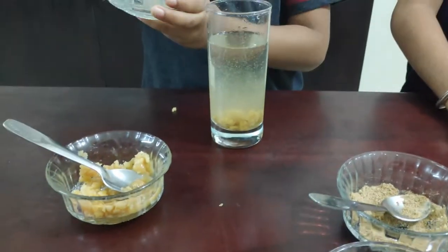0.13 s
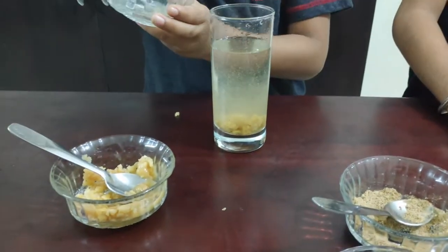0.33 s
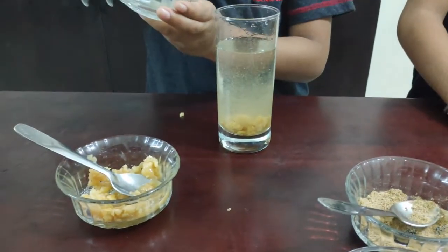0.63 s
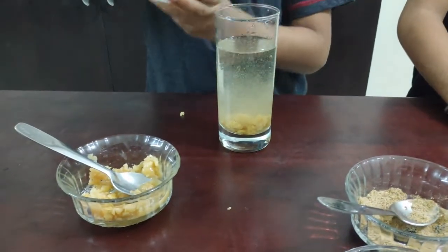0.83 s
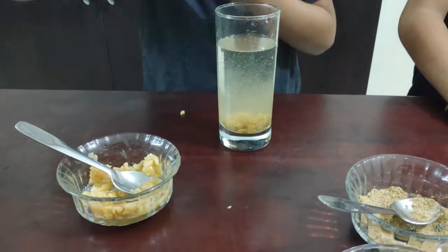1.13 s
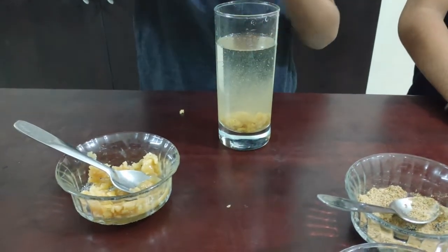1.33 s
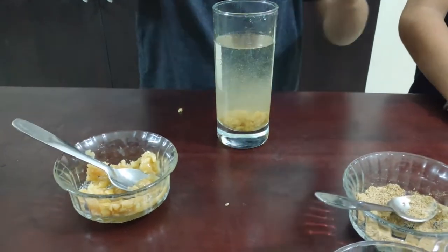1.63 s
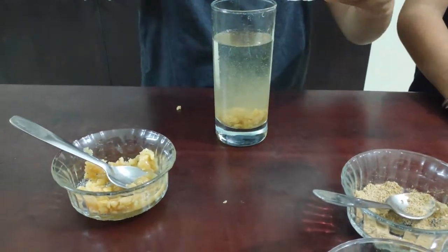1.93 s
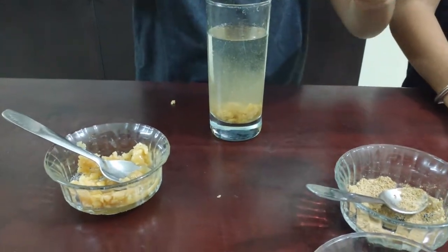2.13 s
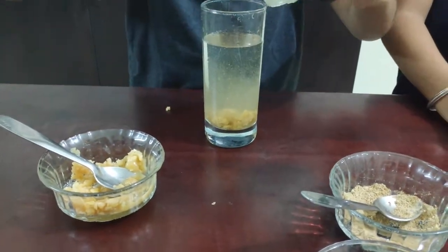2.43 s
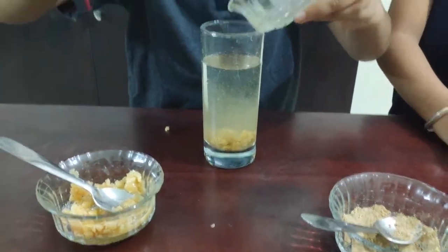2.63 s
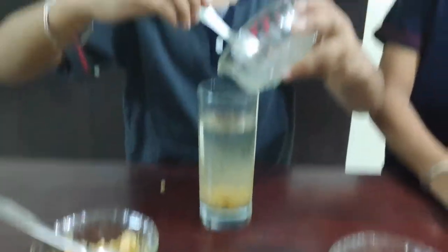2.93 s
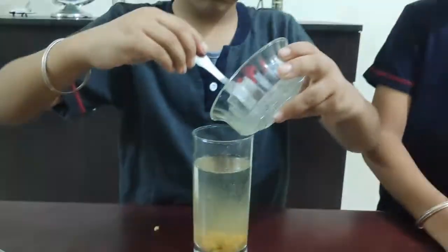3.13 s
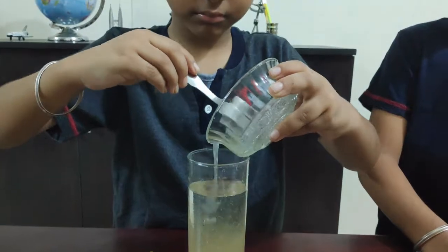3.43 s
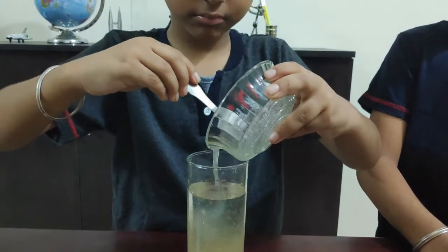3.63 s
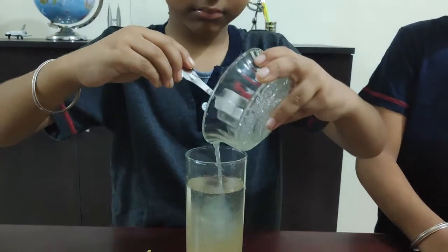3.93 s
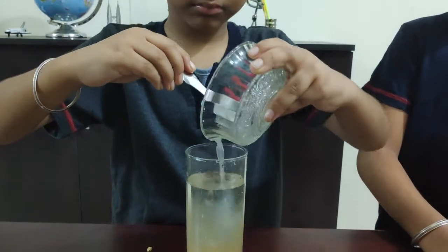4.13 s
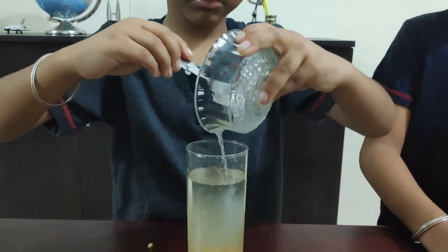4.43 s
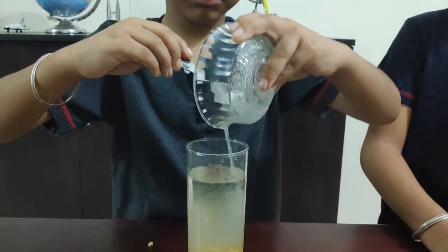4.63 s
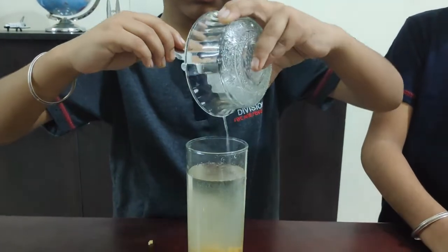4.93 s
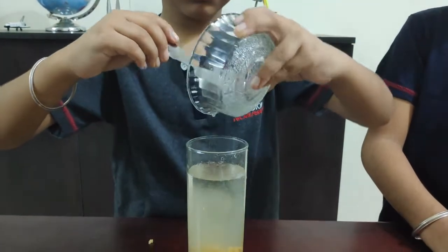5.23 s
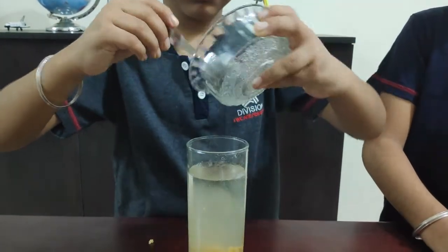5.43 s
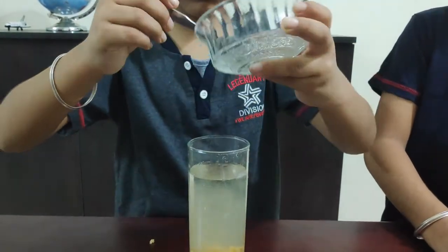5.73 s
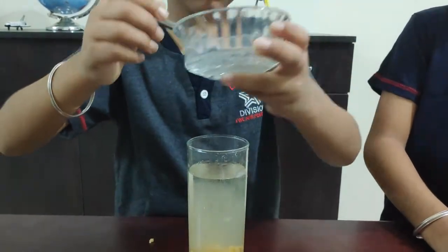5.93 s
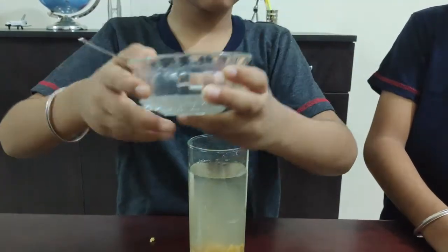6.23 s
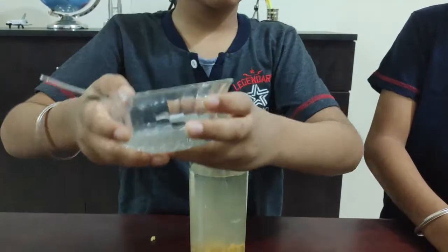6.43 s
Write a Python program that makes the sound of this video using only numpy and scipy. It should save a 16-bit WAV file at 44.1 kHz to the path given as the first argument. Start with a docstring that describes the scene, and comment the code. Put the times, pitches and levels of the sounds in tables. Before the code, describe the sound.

In a hard-walled room, a spoon taps a hand-held glass bowl; one wooden thud rattles glassware, then liquid pours briefly with small plops.

```python
"""A clink is already dying away in a hard-walled kitchen as a steel spoon clinks and scrapes in a hand-held glass bowl:
damped modes struck at bottom, wall or rim, and band-filtered friction noise. At 3 s one knock on the wooden table
thuds and sets glassware ringing. Then juice is tipped into a tumbler: fine spatter, a gush of low noise, and drops
that tick and plop as trapped bubbles, while the spoon clinks on to the end. A phone with two unlike ports listens
from close by, through echoes, reverberation and a low room tone."""
import sys
import numpy as np
from scipy import signal
from scipy.fft import rfft, irfft
from scipy.io import wavfile
from scipy.ndimage import uniform_filter1d

SR = 44100
rng = np.random.default_rng(int(sys.argv[2]) if len(sys.argv) > 2 else 0)


def to_wav(sig):
    """Store sig (one row per channel, or 1-D mono) as 16-bit WAV at the path in sys.argv[1].

    Samples outside -1..1 are clipped; the rate is SR.
    """
    pcm = np.clip(np.atleast_2d(sig), -1, 1) * 32767
    pcm = np.round(pcm).astype(np.int16)
    wavfile.write(sys.argv[1], SR, pcm.T)  # frames by channels


N = 289852
T = np.arange(N) / SR
AGE = T[:SR]  # time since a blow, s
ATTACK = SR // 100  # a hundredth of a second, in samples
TOP_HZ = 15900  # the phone's upper limit


def undb(db):
    """Amplitude ratio: 20 dB is a factor of ten."""
    return 10 ** (np.asarray(db) / 20)


def along(hz, points, column=1):
    """Interpolate a table on a log-frequency axis, as pitch is heard."""
    points = np.array(points)
    return np.interp(np.log(hz + 1e-9), np.log(points[:, 0]), points[:, column])


def bins(x):
    """Frequencies of the Fourier components of a sound."""
    return np.fft.rfftfreq(x.shape[-1], 1 / SR)


def noise(points, size):
    """Coloured noise: a white spectrum shaped by a (f/Hz, level/dB) table, then scaled to rms 1."""
    white = rng.standard_normal(size)
    coloured = irfft(rfft(white) * undb(along(bins(white), points)), size)
    return coloured / coloured.std()


def fade(t60):
    """Exponential damping: the amplitude falls 60 dB in t60 seconds."""
    return np.exp(-np.log(1000) * AGE / t60)


def blow(x, db):
    """Impact level: set the rms of a blow's first hundredth of a second."""
    return x * undb(db) / np.sqrt(np.mean(x[:ATTACK] ** 2))


def ring(modes, stretch=1, scatter_db=0):
    """Modal superposition: damped sines, weighted a little differently at each striking point."""
    out = 0
    for hz, db, t60 in modes:
        gain = undb(db + scatter_db * rng.standard_normal())
        phase = 2 * np.pi * (hz * stretch * AGE + rng.random())
        out = out + gain * fade(t60) * np.sin(phase)
    return out


def cluster(hz):
    """Beating: a high mode interferes with two weaker neighbours."""
    return ring([(hz, 0, .03), (hz + 95, -8, .04), (hz - 170, -5, .01)])


def add(track, s, x):
    """Superposition: mix x into the track at time s."""
    i = int(s * SR)
    track[i:i + len(x)] += x[:len(track) - i]


def room_tone():
    """Stereo coherence: both ports share a low hum; the opposed-phase part is relatively stronger in the treble."""
    # colour of the room tone: f/Hz, relative level/dB
    hum_colour = [(15, -13.5), (26, -3.5), (37, 10), (55, -8), (90, -8), (200, -10.5), (400, -14.5),
                  (540, -24.5), (1100, -25), (2400, -30), (5000, -33), (16000, -36)]
    mid, side = noise(hum_colour, size=N), noise(hum_colour, size=N)
    width = undb(along(bins(side), [(40, -12.5), (250, -14.5), (700, 0.0), (3000, -3.0)]))
    side = irfft(rfft(side) * width, N)
    return undb(-61.0) * (mid + np.array([side, -side]))


def kitchen(dry, wet_db):
    """Room response: direct sound, discrete echoes and a diffuse tail, less alike at the ports as pitch rises."""
    # discrete echoes, from nearby surfaces to a late room flutter: delay/s, level/dB
    echoes = [(.0007, -4), (.0017, -18), (0.013, -9.5), (.0175, -26.5), (0.082, -25)]
    # reverberation: f/Hz, t60/s, level/dB before the wet level is added
    reverberation = [(149.5, 0.51, 2), (770, 0.96, -3), (2470, 0.73, -1), (6240, 0.58, -3),
                     (11700, 0.46, 0.5), (16200, 0.45, -7)]
    edges = np.r_[0, np.geomspace(200, 14000, 12), SR]
    hz, shared = bins(AGE), rfft(rng.standard_normal(SR))
    alike = np.exp(-(hz / 550) ** 2)  # long waves are the same at both ports
    out = []
    for _ in range(2):
        own = rfft(rng.standard_normal(SR))
        white = np.sqrt(alike) * shared + np.sqrt(1 - alike) * own
        response = np.zeros(SR)
        for lo, hi in zip(edges, edges[1:]):
            centre = (lo + min(hi, TOP_HZ)) / 2
            tail = fade(along(centre, reverberation)) * (1 - fade(0.02))
            band = irfft(white * (hz >= lo) * (hz < hi), SR)
            level = undb(wet_db + along(centre, reverberation, 2))
            response += level * band * tail / np.linalg.norm(tail)
        response[0] += 1  # direct sound
        for delay, db in echoes:
            detour = .0005 * rng.random()  # each port has its own path, s
            add(response, delay + detour, undb([db]))
        out.append(signal.fftconvolve(dry, response)[:len(dry)])
    return np.array(out)


def stream():
    """Turbulent burble: low coloured noise swells and dies exponentially as juice gushes into the drink."""
    peak_s, rise_s, fall_s = 3.93, .1, 0.3  # rise and fall are time constants
    gush = undb(-60.5) * np.exp(-np.maximum((peak_s - T) / rise_s, (T - peak_s) / fall_s))
    burble = [(50, -15.5), (110, -1), (240, 2.0), (420, -9), (2000, -24.5), (9000, -39.0)]  # f/Hz, level/dB
    return gush * noise(burble, size=N)


def friction():
    """Stick-slip: grainy noise from sliding edges that catch and let go, each swell in its own resonance."""
    # soft scrapes, rubs and faint squeaks: middle t/s, length/s, f/Hz, bandwidth/Hz, level/dB
    rubs = [(1.014, 0.12, 1080, 500, -75), (1.874, 0.5, 1128, 110, -77.5), (2.1, 0.15, 179, 112.7, -68),
            (3.7, 0.29, 2560, 701, -72.5), (5.824, 0.09, 9300, 6250, -61.5), (5.953, 0.3, 1480, 1000, -68),
            (6.276, 0.14, 700, 1430, -61.5), (6.535, 0.16, 12400, 1510, -66)]
    catch_db = 2  # spread of the level from one hundredth of a second to the next
    out = 0
    for s, length, hz, width, db in rubs:
        holds = np.repeat(rng.standard_normal(N // ATTACK + 1), ATTACK)[:N]
        grains = undb(2.5 * rng.exponential(size=N))
        slips = undb(catch_db * holds) * rng.standard_normal(N) * grains
        resonance = 1 / (1 + (2 * (bins(slips) - hz) / width) ** 2)
        band = irfft(rfft(slips) * resonance, N)
        swell = np.exp(-(2 * (T - s) / length) ** 2)
        out = out + undb(db) * band / band.std() * swell
    return out


def tick():
    """Surface impact: a drop's slap is a short burst of bright noise."""
    return noise([(1500, -21), (4500, 0.0), (7500, -3.5), (15000, -4.5)], size=SR) * fade(.012)


def drips(lead):
    """Bubble resonance: big drops tick and trap a short-lived bubble; fine spatter only ticks."""
    # drops landing in the tumbler: t/s, bubble f/Hz, plop level/dB
    drops = [(3.739, 1650, -50), (4.2083, 1650, -54), (4.4308, 2530, -75), (4.9206, 2310, -63),
             (5.1518, 2170, -53), (5.178, 1940, -42.5), (5.351, 2100, -57)]
    tick_db = -52.5  # every big drop's tick
    spatter_start_s, spatter_end_s, spatter_db, spatter_spread_db = 3.6, 3.8, -70.5, 4
    out = np.zeros(N + SR)
    for s, hz, plop_db in drops:
        plop = np.sin(2 * np.pi * hz * AGE) * fade(0.01) * (1 - fade(0.0072))
        add(out, s + lead, blow(plop, plop_db) + blow(tick(), tick_db))
    for when in (np.arange(9) + rng.random(size=9)) / 9:  # nine ticks, unevenly spaced
        s = spatter_start_s + when * (spatter_end_s - spatter_start_s)
        add(out, s + lead, blow(tick(), spatter_db + spatter_spread_db * rng.standard_normal()))
    return out


def table(lead):
    """Impact excitation: a knock thuds through the table top and leaves the glassware in free vibration."""
    # noise of the thud: f/Hz, level/dB
    thud_colour = [(40, -6), (110, -4), (200, -3), (310, 8), (450, 0), (560, 1.5), (830, 10.5),
                   (1150, -6.5), (1450, 5.5), (1850, -10), (2500, -8), (3800, -27), (5000, -10.5),
                   (16000, -31)]
    # modes of the shaken glassware: f/Hz, level/dB, t60/s
    glass_modes = [(183, -6, .7), (291, -4, .4), (781, -7, .4), (829, -7, .35), (1152, -7, .4),
                   (1238, -8, .3), (1486, -5, .95), (1637, -8, .25), (2632, -2, .33), (3241, -6, .6),
                   (4430, -11, .25), (4931, -4, .3), (5943, -8, .4), (6336, -4, .25), (7450, 1, .2),
                   (9367, -7, .1), (11200, -8, .2), (13550, -17, .2)]
    # modes of the wooden table top: f/Hz, level/dB, t60/s
    wood_modes = [(308, -22.5, 0.042), (390, -12.5, 0.053), (703, -2, 0.019), (800, -0.5, 0.027),
                  (860, -2, 0.022), (970, -1, 0.025), (1170, -1.5, 0.026), (1354, 2, 0.016),
                  (1827, -1.5, 0.019), (1843, 5, 0.011)]
    knock_s = 2.9783
    out = np.zeros(N + SR)
    push = 1 - fade(.008)  # softens the onset of all three parts
    wood = blow(ring(wood_modes), db=-24)
    rattle = undb(-25.0) * fade(0.15)  # things on the table, faintly
    thud = blow(noise(thud_colour, size=SR) * (fade(0.019) + rattle), db=-21.0)
    glassware = blow(ring(glass_modes), db=-33.5)
    add(out, knock_s + lead, push * (wood + thud + glassware))
    return out


def spoon(lead):
    """Modal excitation by position: contacts click, clack and ring; nearer the rim, more ring and less clack."""
    # spoon on bowl; the grip retunes the spoon:
    # t/s, strength/dB, place (0 bottom to 1 rim), handle's ring f/Hz, scoop's ring f/Hz
    contacts = [(-.02, -34.5, 0.84, 4350, 11200), (.588, -51.5, 0.51, 5350, 9960),
                (1.145, -47.5, 0.29, 7180, 8530), (1.552, -39, 0.66, 4500, 10760),
                (1.584, -41, 0.65, 4120, 10540), (1.64, -37, 0.7, 4400, 10160),
                (2.3306, -39.5, 0.027, 4630, 10120), (2.9182, -40.5, 0.3, 4630, 11500),
                (3.4228, -40.5, 0.073, 4650, 11060), (3.8907, -38.5, 0.39, 4790, 11450),
                (4.0312, -34, 0.94, 3490, 11480), (4.3405, -38.5, .5, 5470, 11770),
                (4.515, -27.5, 0.87, 4750, 11000), (4.7834, -35.5, 0.493, 5280, 11670),
                (5.021, -41, 0.77, 4750, 11000), (5.3493, -62, 0.0074, 4100, 10300),
                (5.628, -46.5, 0.52, 3703, 10250), (5.9735, -56, 0.26, 2750, 11540),
                (6.1131, -34, 0.69, 3710, 10380), (6.127, -37.5, 0.64, 3300, 11000),
                (6.4628, -52.5, 0, 4270, 12250)]
    # the held bowl's bright ring at rest pitch: f/Hz, level/dB, t60/s
    bowl_modes = [(3440, -36, .04), (4480, -29, .03), (6370, 0, .031), (6440, -14, .07), (6900, -20, .01)]
    # the bowl's lowest pair of modes: f/Hz, level/dB, t60/s
    low_modes = [(2615, 0, .04), (2660, -3, .14)]
    # the bowl's pitch, sinking as juice runs up its wall and recovering as it drains: t/s, f/Hz
    bowl_pitch = [(0, 6394), (1.6, 6444), (3.9, 6328), (4.5, 6384), (6.1, 6494)]
    # the spoon's dull clack: f/Hz, level/dB, t60/s
    clack_modes = [(720, -8, .012), (1250, -7, .009), (1620, 0, .013), (1950, -2, .01), (3100, -7, .008),
                   (3770, -15, .015), (4660, -9, .014), (5400, -9, .014)]
    # high partials of steel and glass: f/Hz, level/dB, t60/s
    shimmer_modes = [(9800, -6, .02), (10100, -7, .03), (11490, 0, .035), (13800, -6, .02),
                     (14300, -4, .025), (14900, 0, .03), (15420, 0, .03)]
    # noise of the contact click: f/Hz, level/dB
    click_colour = [(400, -18), (1200, -29), (2400, -4.5), (3200, 0.5), (4600, -5.5), (7000, 3),
                    (8300, -3.5), (10500, 1.5), (13000, -5.5), (16000, -8)]
    # each part against the click: level/dB at the bottom, on the wall, at the rim
    place_db = {"clack": (-2, -4.5, -38), "low": (-26, -19, -4), "bowl": (-25.5, -3.5, 18),
                "top": (-25.5, -15, 9), "scoop": (-2, -3.5, 0), "handle": (-8.5, -13.5, -19)}
    bowl_rest_hz, bowl_top_hz = 6367, 10726  # reference pitch; highest strong mode at rest
    out = np.zeros(N + SR)
    bite = 1 - fade(0.0042)  # the edge takes a moment to seat on the glass
    for s, db, place, handle_hz, scoop_hz in contacts:
        grip = 1 + .005 * rng.standard_normal()
        stretch = np.interp(s, *np.transpose(bowl_pitch)) / bowl_rest_hz
        click = noise(click_colour, size=SR) * fade(.017)
        shimmer = ring(shimmer_modes, grip, scatter_db=2.5)
        scoop_overtone = undb(-5) * cluster(9250 + scoop_hz / 2)
        parts = {
            "clack": ring(clack_modes, grip, scatter_db=1.5),
            "low": ring(low_modes),
            "bowl": ring(bowl_modes, stretch),
            "top": cluster(bowl_top_hz * stretch),
            "scoop": cluster(scoop_hz) + scoop_overtone,
            "handle": ring([(handle_hz, 0, 0.047)]),
        }
        sound = blow(click, 0) + blow(shimmer, -5.5)  # shimmer is the same at every place
        for name, part in parts.items():
            sound += blow(part, np.interp(place, (0, .5, 1), place_db[name]))
        add(out, s + lead, undb(db) * bite * sound)
    return out


def scene():
    """Superposition in one room, already ringing from a clink just before; the two ports differ in response."""
    # the ports hear the treble differently: f/Hz, left minus right level/dB
    ports = [(300, -1), (900, 0), (2000, -3), (2700, -6), (4200, -2), (5400, -7), (6400, -12), (8000, -8),
             (9500, -2), (10800, 1), (12000, 5), (13200, 11), (14300, 9), (15500, 13)]
    lead = .1  # time computed ahead of the start, s
    start = int(lead * SR)
    solids, juice = spoon(lead) + table(lead), drips(lead)
    add(solids, lead, friction())
    add(juice, lead, stream())
    wet = kitchen(solids, wet_db=1.5) + kitchen(juice, wet_db=-1.0)
    balance = undb(along(bins(wet), ports))
    # the two gains keep a constant summed power
    gains = np.array([balance, np.ones_like(balance)]) * np.sqrt(2 / (1 + balance ** 2))
    heard = irfft(rfft(wet) * gains, len(juice))
    return heard[:, start:start + N] + room_tone()


def record(dry):
    """Band limitation: the phone cuts the top with a steep elliptic low-pass."""
    return signal.sosfilt(signal.ellip(10, .2, 70, TOP_HZ, fs=SR, output="sos"), dry)


dry = scene()
out = record(dry)
to_wav(out)
```